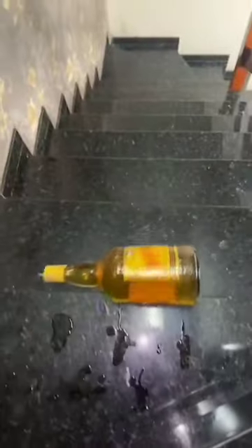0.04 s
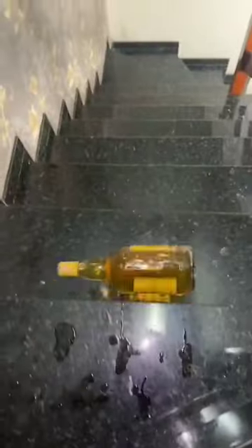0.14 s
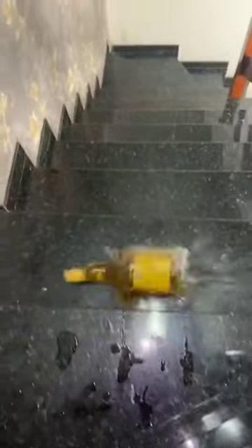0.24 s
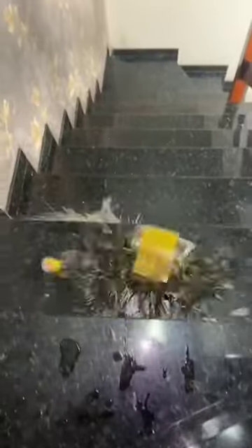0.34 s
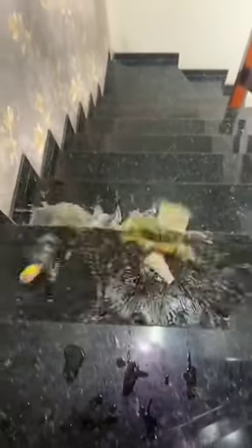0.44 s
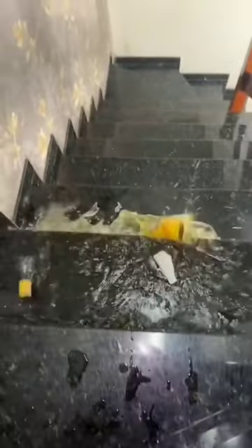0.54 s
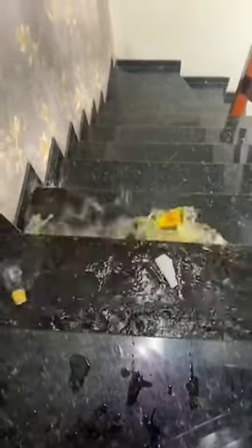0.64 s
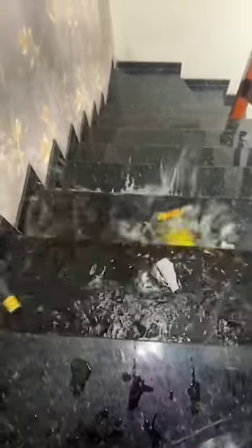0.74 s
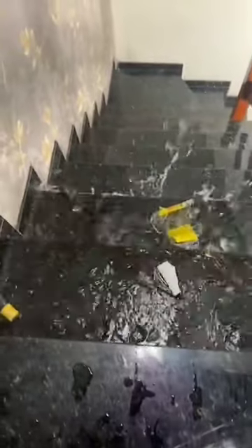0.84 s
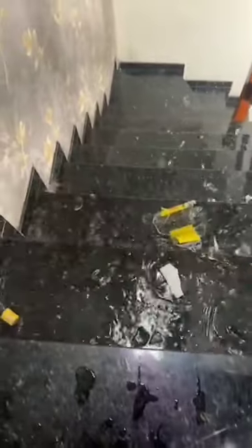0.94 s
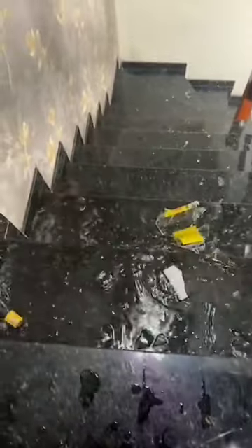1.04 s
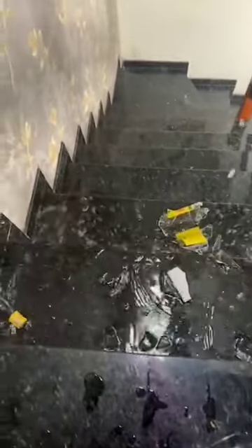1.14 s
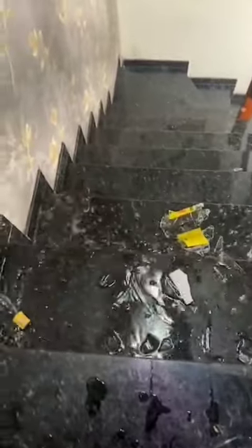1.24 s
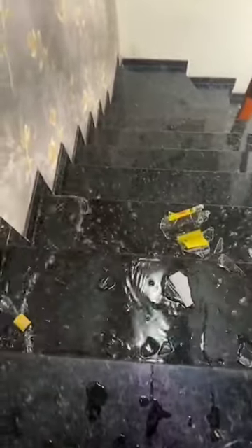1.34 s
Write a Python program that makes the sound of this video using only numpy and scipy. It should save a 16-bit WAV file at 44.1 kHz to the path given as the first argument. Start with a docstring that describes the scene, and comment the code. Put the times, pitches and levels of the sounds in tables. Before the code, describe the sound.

A full glass bottle shatters in a hard, echoing stairwell. Faint old echo and quiet air until 0.21 s, when it ticks on stone and bursts loudly with a low liquid slap. At 0.35 s a piece clanks and bounces rapidly. Shards clink around 0.6 s; a second sharp break at 0.69 s brings the thick base's dull knocks. Fine splinters skitter until about 1.2 s as reverberation fades. Phone sound, effectively mono.

```python
"""In a hard, echoing stairwell, quiet air, the last of an earlier echo and a low boom are coloured noise.
A full glass bottle ticks and rings on a stone step, then cracks and bursts in noise and tiny rings
while its liquid slaps the stone, a low noise. A piece of its wall clanks on the next step in ringing modes.
Splinters patter as clouds of tiny rings and a large shard clinks; the glass breaks again, the heavy base
lands and rocks in low modes, and splinters skitter on. A phone microphone hears it, alike in both channels."""
import sys
import numpy as np
from scipy import signal
from scipy.fft import rfft, irfft
from scipy.io import wavfile

SR = 44100
rng = np.random.default_rng(int(sys.argv[2]) if len(sys.argv) > 2 else 0)


def transcribe(u):
    """Save the signal u as a 16-bit wav file named by the first command-line argument.

    u: samples, shape (n,) or (channels, n), limited to [-1, 1]; the rate is SR.
    q: integer samples, one column per channel.
    """
    v = np.clip(np.atleast_2d(u).T, -1, 1)
    q = np.round(v * 32767).astype(np.int16)
    wavfile.write(sys.argv[1], SR, q)


N = 61740  # 1.4 s
T = np.arange(N) / SR  # s
LEVEL_WINDOW_S = .01  # an event's level is its whole energy, as rms over this time
BOUNCE_TICK_DB = -11  # dry tick of glass on stone against the ring, for pieces that bounce


def undb(db):
    """Decibels to gain."""
    return 10 ** (np.asarray(db) / 20)


def unit(x):
    """Scale to unit energy."""
    return x / np.sqrt(np.sum(x ** 2) + 1e-18)


def unit_rms(x):
    """Scale a full-length sound to an rms of one."""
    return unit(x) * np.sqrt(N)


def decay(t60, t=T):
    """Exponential decay that falls 60 dB in t60 seconds."""
    return np.exp(-np.log(1000) * t / t60)


def swell(t, rise, fall):
    """Straight rise, then exponential fall, with both times in seconds."""
    return np.minimum(t / rise, 1) * np.exp(-np.maximum(t - rise, 0) / fall)


def add(out, start, x, db):
    """Mix in a sound from its start, with its energy set by db over the level window."""
    i = int(start * SR)
    event = unit(x) * undb(db) * np.sqrt(LEVEL_WINDOW_S * SR)
    out[i:] += event[:N - i]


def colour(x, points):
    """Minimum-phase filter through (frequency [Hz], gain [dB]) points, so nothing sounds early."""
    hz, db = np.array(points, float).T
    f = np.maximum(np.fft.rfftfreq(2 * N, 1 / SR), 1)
    gain = undb(np.interp(np.log(f), np.log(hz), db))
    # folding the cepstrum onto positive time makes the filter causal
    cepstrum = irfft(np.log(gain))
    cepstrum[1:N] *= 2
    cepstrum[N + 1:] = 0
    return irfft(rfft(x, 2 * N) * np.exp(rfft(cepstrum)))[:N]


def background():
    """Steady coloured noise for air, decaying noise for an old echo, and a narrow low band for the boom."""
    # stairwell air: (frequency [Hz], gain [dB])
    air_colour = [(25, -15), (75, -0.5), (130, 3.5), (400, -5), (1500, -2), (5000, -9.5), (8000, -19.5),
                  (15000, -22.5)]
    # an earlier echo dying away: (frequency [Hz], gain [dB])
    echo_colour = [(40, -31), (80, -10), (150, -28), (330, -4.5), (800, -14.5), (1300, -24.5),
                   (4000, -38.5), (8000, -52), (15000, -49)]
    # faint low boom lingering in the stairwell: (time [s], level [dB])
    boom_levels = [(0, -60.5), (.45, -56.5), (.55, -54.5), (.9, -62), (1.1, -58), (1.4, -106)]
    air_db, old_echo_db, old_echo_t60_s = -60.5, -43, .7
    boom_hz, boom_width_hz = 86.7, 29

    air = unit_rms(colour(rng.standard_normal(N), air_colour))
    old_echo = unit_rms(colour(rng.standard_normal(N), echo_colour)) * decay(old_echo_t60_s)
    f = np.fft.rfftfreq(N, 1 / SR)
    boom_band = np.exp(-((f - boom_hz) / boom_width_hz) ** 2)
    boom = unit_rms(irfft(rfft(rng.standard_normal(N)) * boom_band, N))
    boom_db = np.interp(T, *np.array(boom_levels).T)
    return undb(air_db) * air + undb(old_echo_db) * old_echo + undb(boom_db) * boom


def stairwell(dry):
    """Sparse reflections off near walls and steps, and a dense tail whose bands die at their own rates."""
    # reverberation by band: (frequency [Hz], t60 [s], level [dB])
    room_bands = [(105.6, 3.3, -21), (306, 0.95, 0.5), (790, 0.8, -0.5), (1920, 0.71, -1),
                  (4630, 0.76, -5.5), (8300, 0.51, 3.5), (14800, 0.22, 3)]
    build_s, early_s = .006, .025  # build-up of the tail, decay of the early reflections
    tail_db, early_db = 0.5, -1.5

    hz, t60, db = np.array(room_bands).T
    log_f = np.log(np.maximum(np.fft.rfftfreq(N, 1 / SR), 1))
    noise = rfft(rng.standard_normal(N))
    tail = np.zeros(N)
    for weights, band_t60, band_db in zip(np.eye(len(hz)), t60, db):
        band = irfft(noise * np.interp(log_f, np.log(hz), weights), N)
        tail += band * decay(band_t60) * undb(band_db)
    tail *= 1 - np.exp(-T / build_s)
    reflects = (rng.random(N) < 1500 / SR) * (T > .003)  # about 1500 a second, none in the first 3 ms
    early = rng.standard_normal(N) * reflects * np.exp(-T / early_s)
    response = undb(tail_db) * unit(tail) + undb(early_db) * unit(early)
    return signal.fftconvolve(dry, response)[:N]


def grains(rise, fall, centre_hz, octaves, t60, scatter_db, count=700, size=2048):
    """A cloud of tiny ringing fragments, scattered in pitch, level and decay, that swells and dies away."""
    out, t = np.zeros(N + size), T[:size]
    when = (np.arange(count) + rng.random(count)) / count * (rise + 4 * fall)
    strength = swell(when, rise, fall)
    for start, gain, (pitch, loud, length) in zip(when, strength, rng.standard_normal((count, 3))):
        hz = centre_hz * 2 ** (octaves * pitch)
        if hz < SR / 2:
            i = min(int(start * SR), N)
            ring = np.cos(2 * np.pi * hz * t) * decay(t60 * 2 ** (length / 2), t)
            soft_start = 1 - np.exp(-hz * t)
            out[i:i + size] += gain * undb(scatter_db * loud) * ring * soft_start
    return out[:N]


def glass(hits, modes, tick_db):
    """Each blow ticks on the stone and rings the piece's modes in a slightly new mix."""
    # dry tick of glass on stone: (frequency [Hz], gain [dB])
    contact_colour = [(30, -44), (120, -25), (400, -21), (1200, 8), (5000, -7), (9000, -18), (15000, -11)]
    contact_t60_s = .012
    vary_db, detune = 2, .003  # spread of each mode's level and pitch (share) from blow to blow
    radiates_from = 0.97  # a piece radiates little below this share of its lowest mode

    out = np.zeros(N)
    lowest_hz = modes[0][0]
    small_body = signal.butter(3, radiates_from * lowest_hz, "highpass", fs=SR, output="sos")
    for start, db in hits:
        ring = np.zeros(N)
        for (hz, mode_db, t60), (a, b) in zip(modes, rng.standard_normal((len(modes), 2))):
            tone = np.sin(2 * np.pi * hz * (1 + detune * b) * T)
            ring += undb(mode_db + vary_db * a) * tone * decay(t60)
        ring = signal.sosfilt(small_body, ring)
        tick = colour(rng.standard_normal(N) * decay(contact_t60_s), contact_colour)
        add(out, start, unit(ring) + undb(tick_db) * unit(tick), db)
    return out


def splinters():
    """Small fragments, mostly bright, land and skitter as clouds of very short rings."""
    # showers: (time [s], level [dB], centre [Hz], spread [octaves], rise [s], fall [s])
    showers = [(.543, -38.5, 11800, 0.13, 0.0019, 0.031), (.586, -26.5, 10400, 0.15, 0.00099, .004),
               (0.605, -26, 10130, 0.27, 0.0052, 0.0043), (.625, -56, 8950, .14, 0.0074, .014),
               (0.686, -17.5, 9470, 0.22, .008, 0.01), (0.8, -32.5, 3890, 0.022, 0.0036, 0.011),
               (.822, -26.5, 7560, 0.064, 0.027, 0.033), (.955, -45.5, 1950, .03, 0.0032, 0.0089),
               (.96, -46, 11700, 0.16, 0.016, 0.017), (0.98, -29, 8560, 0.3, 0.025, .022),
               (1.04, -38, 6880, 0.96, 0.033, 0.056), (1.117, -35.5, 9520, 0.92, 0.022, 0.046),
               (1.301, -53, 2350, 0.044, 0.00064, 0.00376)]
    out = np.zeros(N)
    for start, db, hz, octaves, rise, fall in showers:
        add(out, start, grains(rise, fall, hz, octaves, t60=0.0064, scatter_db=2), db)
    return out


def large_shard():
    """A large shard clinks in a close group of high modes."""
    # clinks: (time [s], level [dB])
    shard_hits = [(.583, -28), (.594, -32), (.604, -32), (.626, -40), (.652, -42)]
    # modes of the shard: (frequency [Hz], level [dB], t60 [s])
    shard_modes = [(3750, -12, .025), (4480, -7, .04), (4603, 0, .065), (4730, -6, .045), (5954, -16, .025)]
    return glass(shard_hits, shard_modes, BOUNCE_TICK_DB)


def heavy_base():
    """The thick base lands and rocks, ringing in low, short modes."""
    # landing and rocking: (time [s], level [dB])
    base_hits = [(.694, -23), (.701, -24.5), (.712, -21.5), (.7235, -14.5), (.778, -24.5), (.787, -26),
                 (.796, -27)]
    # modes of the base: (frequency [Hz], level [dB], t60 [s])
    base_modes = [(615, -6, .03), (700, -6, .03), (755, -1, .035), (785, 0, .04), (860, -9, .025),
                  (950, -9, .03), (1540, -9, .03), (1675, -6, .03), (1930, -6, .03)]
    return glass(base_hits, base_modes, BOUNCE_TICK_DB)


def wall_piece():
    """A piece of the bottle's wall bounces on the next step and clanks in its modes."""
    # bounces: (time [s], level [dB])
    wall_hits = [(.348, -28), (.3555, -19), (.365, -23), (.378, -23), (.393, -26), (.411, -28), (.433, -27),
                 (.478, -31), (.507, -33)]
    # modes of the piece: (frequency [Hz], level [dB], t60 [s])
    wall_modes = [(1055, 1, .06), (1110, -5, .04), (1160, 0, .07), (2105, 1, .07), (3828, 2, .08),
                  (3890, -2, .06), (4635, -1, .06), (4996, -7, .05), (5642, -1, .06), (6293, -5, .05)]
    return glass(wall_hits, wall_modes, BOUNCE_TICK_DB)


def liquid():
    """The contents hit the stone with a low slap of swelling noise."""
    # slaps: (time [s], level [dB], rise [s], fall [s])
    slaps = [(.218, -24, 0.0063, 0.041), (0.348, -39, 0.025, 0.02), (0.692, -38.5, 0.012, 0.031)]
    # colour of the slap: (frequency [Hz], gain [dB])
    slap_colour = [(25, -28), (70, -14.5), (115, -5), (165, -6), (205, 2.5), (250, -1), (310, -5),
                   (500, -9), (1000, -23), (4000, -41)]
    out = np.zeros(N)
    for start, db, rise, fall in slaps:
        add(out, start, colour(rng.standard_normal(N) * swell(T, rise, fall), slap_colour), db)
    return out


def bursts():
    """Glass gives way in rough cracking noise and hundreds of colliding, briefly ringing fragments."""
    # breaks: (time [s], level [dB], rise [s], fall [s], tilt [dB per octave])
    breaks = [(.220, -10.5, 0.0088, 0.025, 0.9), (.262, -18.5, 0.0073, 0.03, 2.5),
              (.357, -18.5, 0.014, 0.047, 0.4), (0.617, -24.5, 0.024, 0.051, -0.5),
              (0.684, -13.5, 0.016, .02, 0.2), (.745, -22.5, .01, .02, -0.7)]
    # colour of breaking glass before the tilt: (frequency [Hz], gain [dB])
    fracture_colour = [(40, -79), (120, -43), (300, -7), (480, -5.5), (700, 0), (1200, 5.5), (2200, 1),
                       (4000, 2), (6000, -2.5), (9000, -10), (15000, -18)]
    out = np.zeros(N)
    for start, db, rise, fall, tilt_db in breaks:
        cloud = grains(rise, fall, 4092, 1.295, t60=0.004, scatter_db=3.5)
        # the noise jumps in level every 30 samples
        jumps = np.repeat(undb(4 * rng.standard_normal(N // 30 + 1)), 30)[:N]
        cracks = rng.standard_normal(N) * swell(T, rise, fall) * jumps
        mix = unit(cracks) + undb(-3.5) * unit(cloud)
        lowest_hz = fracture_colour[0][0]
        tilted = [(hz, g + tilt_db * np.log2(hz / lowest_hz)) for hz, g in fracture_colour]
        add(out, start, colour(mix, tilted), db)
    return out


def bottle():
    """The whole bottle strikes the step and rings briefly in its modes."""
    # blows on the step: (time [s], level [dB])
    strikes = [(.2096, -25), (.2112, -16)]
    # modes of the whole bottle: (frequency [Hz], level [dB], t60 [s])
    bottle_modes = [(940, 8.5, .014), (1662, 0.5, 0.042), (2850, -25, .012), (3560, 4.5, 0.02),
                    (4250, 4.5, 0.017), (5160, 9, 0.0057), (5730, 5, 0.0078)]
    return glass(strikes, bottle_modes, tick_db=-5)


def scene():
    """All the glass and liquid in the stairwell, the same in both channels."""
    base_room_db = -7.5  # the base rings towards the listener and stirs the stairwell less
    shard_room_db = -3  # how much the shards stir the stairwell
    near = bottle() + wall_piece() + bursts() + liquid()
    base = heavy_base()
    shards = large_shard() + splinters()
    echo = stairwell(near + undb(base_room_db) * base + undb(shard_room_db) * shards)
    mono = near + base + shards + echo + background()
    return np.array([mono, mono])


def record(dry):
    """The phone steps its treble down, rounds the highest peaks and cuts the top."""
    shelf_hz, shelf_db, top_hz = 6480, -4.5, 15550
    f = np.fft.rfftfreq(2 * N, 1 / SR)
    shelf = undb(shelf_db * (1 + np.tanh((f - shelf_hz) / 80)) / 2)
    shelved = irfft(rfft(dry, 2 * N) * shelf)[:, :N]
    top_cut = signal.ellip(10, .2, 80, top_hz, fs=SR, output="sos")
    return signal.sosfilt(top_cut, np.tanh(shelved))


dry = scene()
out = record(dry)
transcribe(out)
```